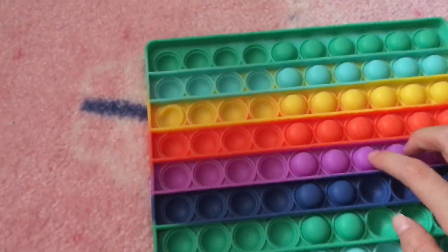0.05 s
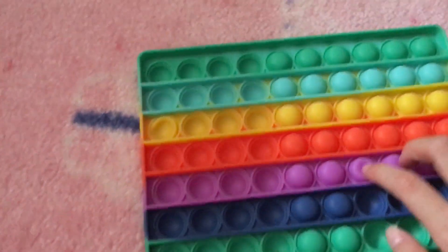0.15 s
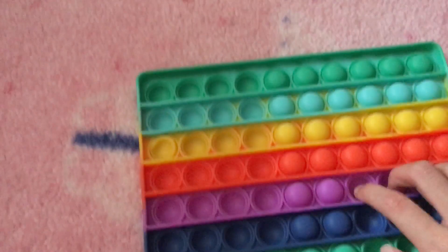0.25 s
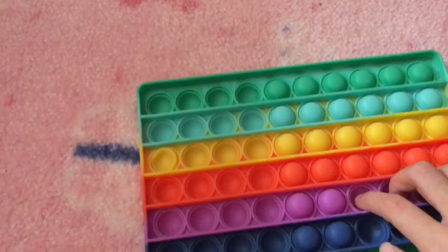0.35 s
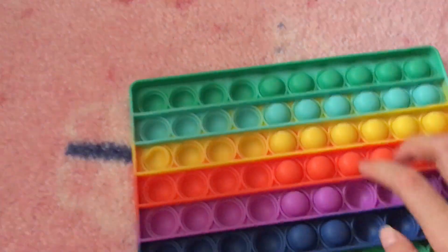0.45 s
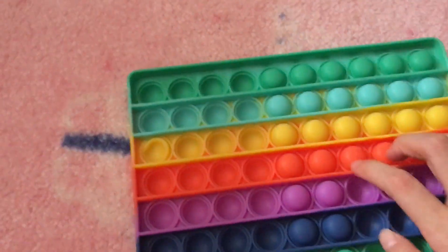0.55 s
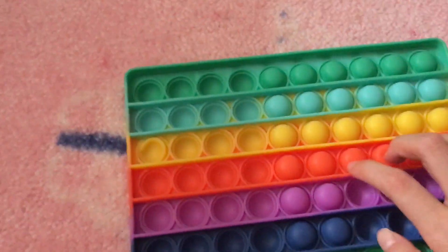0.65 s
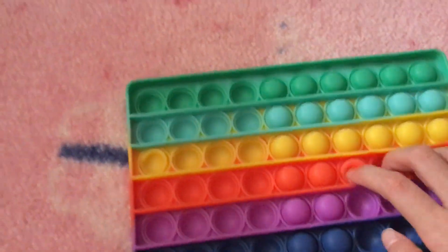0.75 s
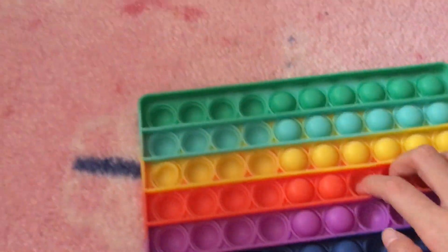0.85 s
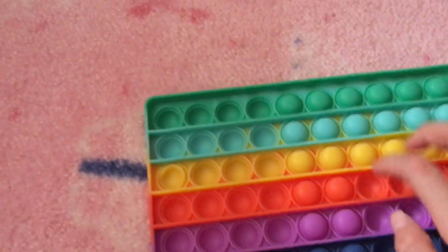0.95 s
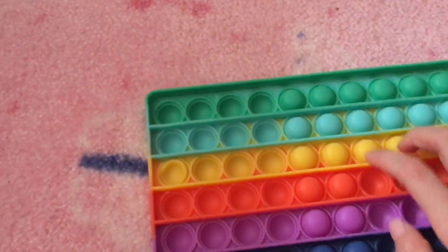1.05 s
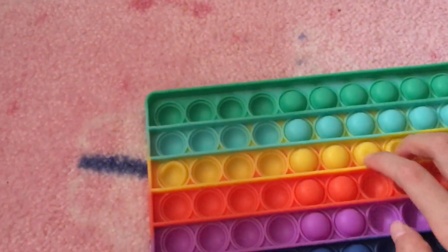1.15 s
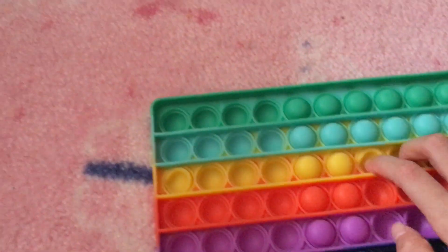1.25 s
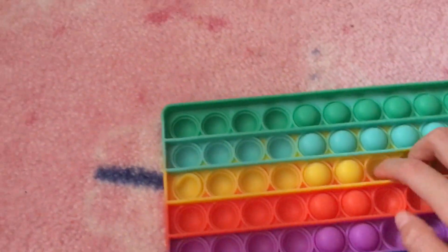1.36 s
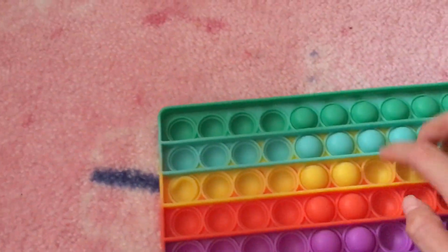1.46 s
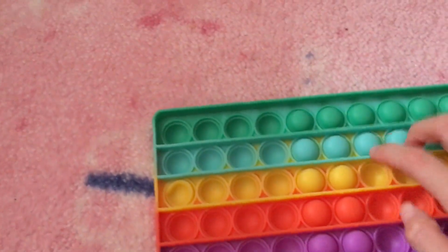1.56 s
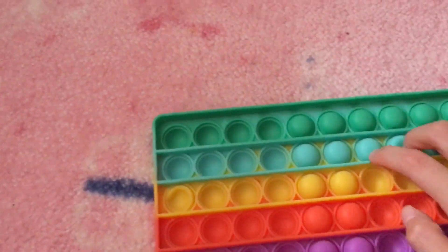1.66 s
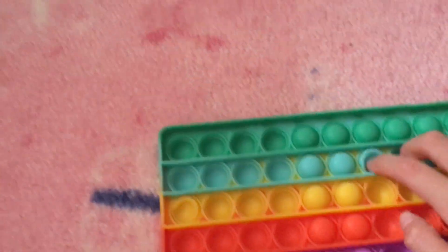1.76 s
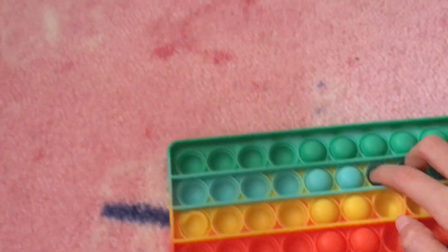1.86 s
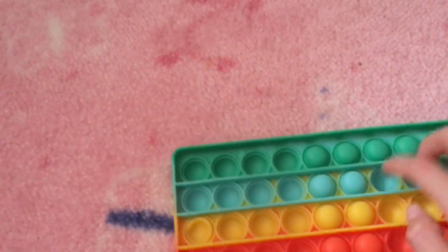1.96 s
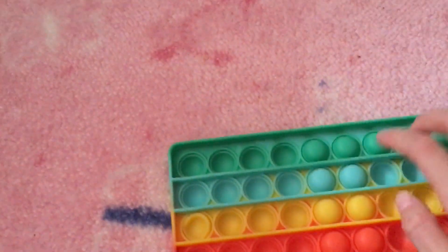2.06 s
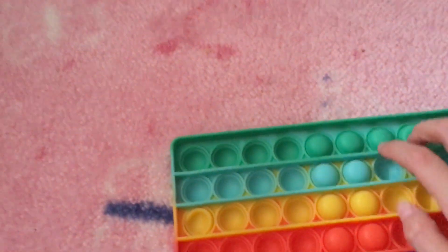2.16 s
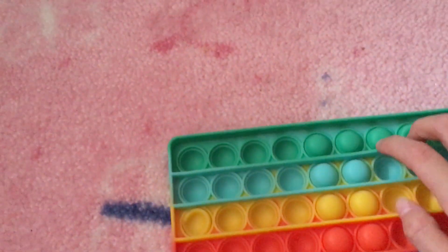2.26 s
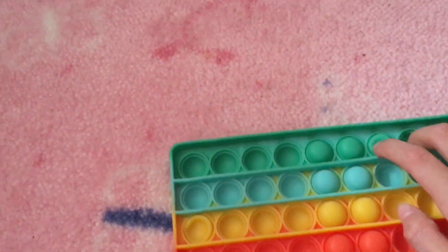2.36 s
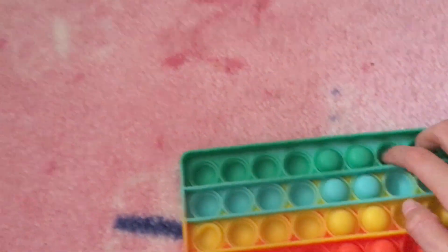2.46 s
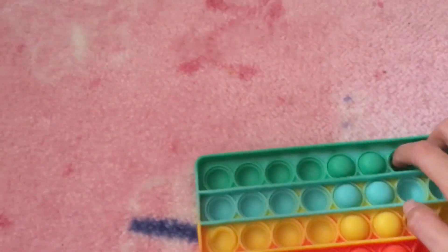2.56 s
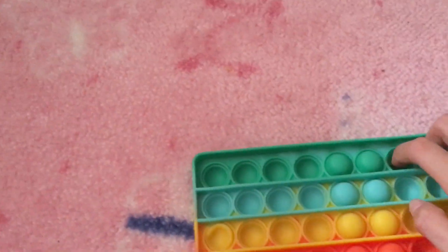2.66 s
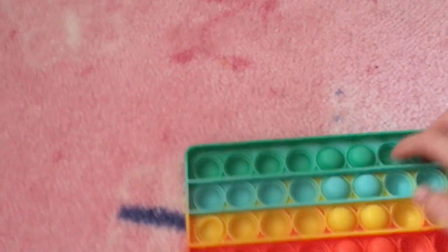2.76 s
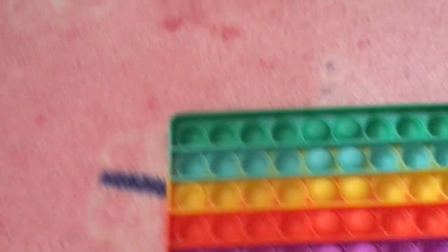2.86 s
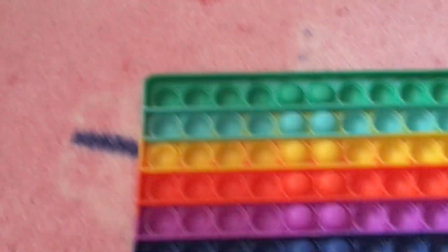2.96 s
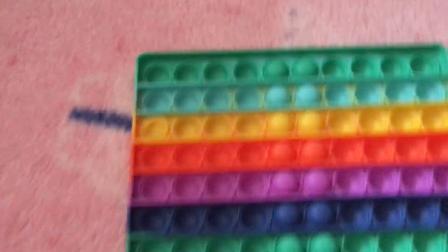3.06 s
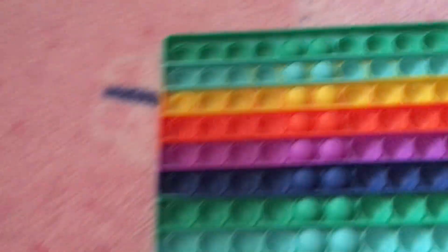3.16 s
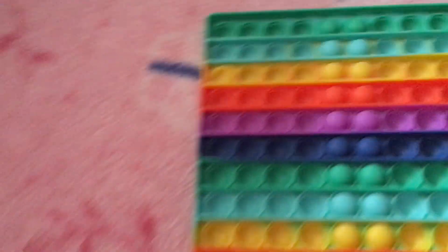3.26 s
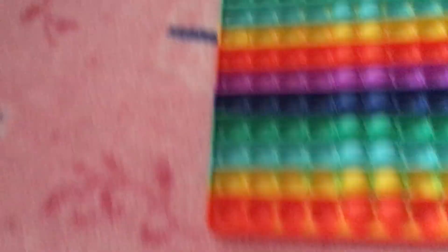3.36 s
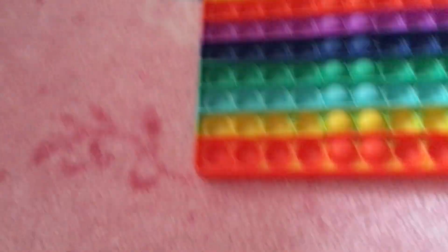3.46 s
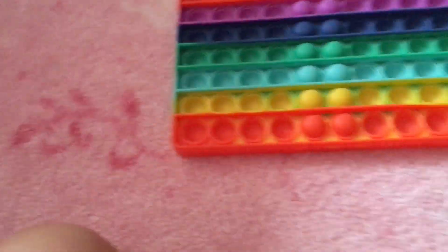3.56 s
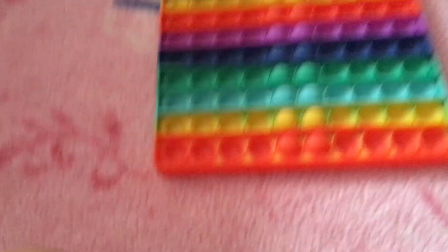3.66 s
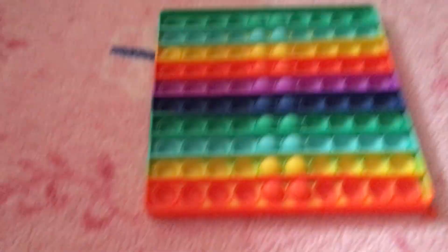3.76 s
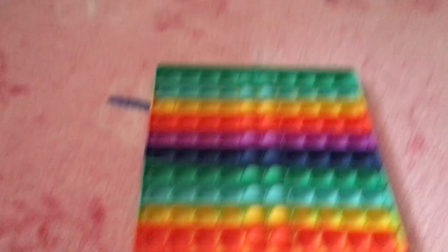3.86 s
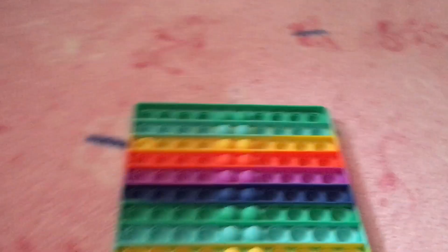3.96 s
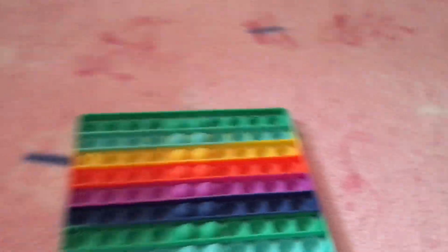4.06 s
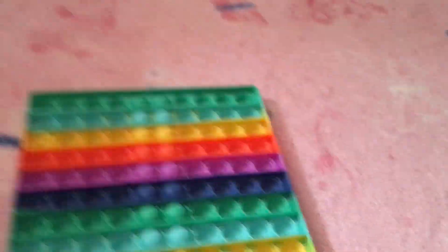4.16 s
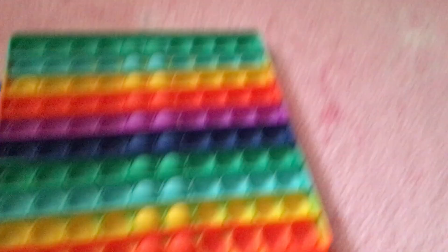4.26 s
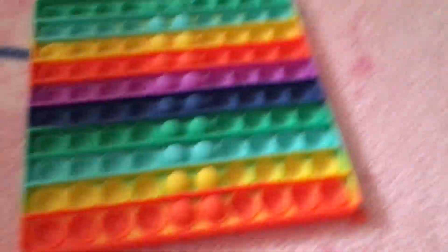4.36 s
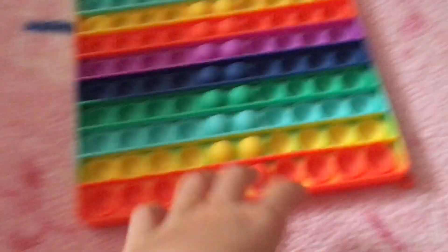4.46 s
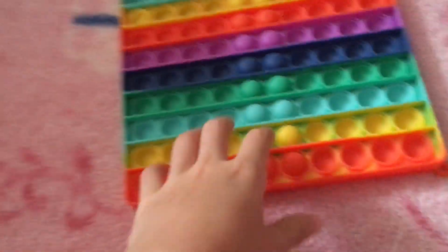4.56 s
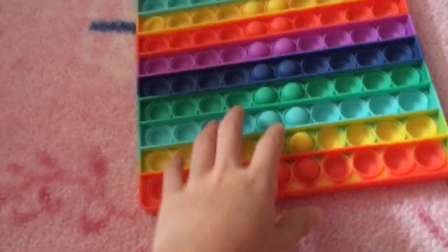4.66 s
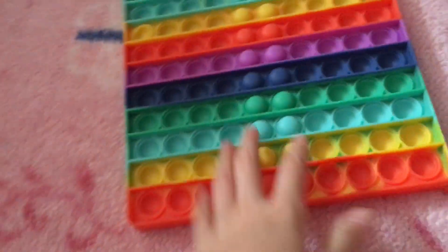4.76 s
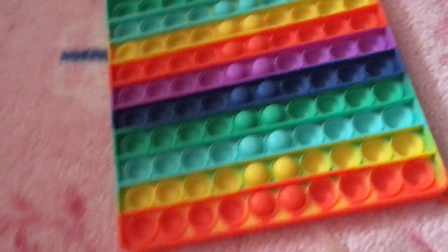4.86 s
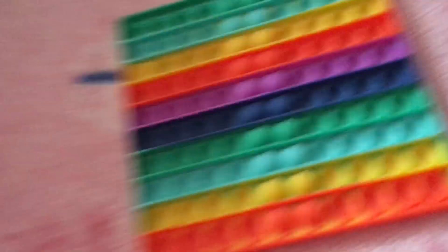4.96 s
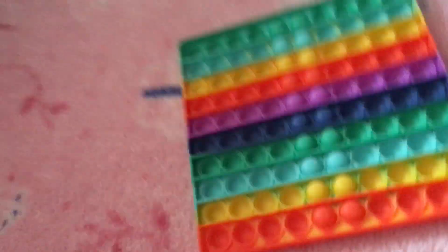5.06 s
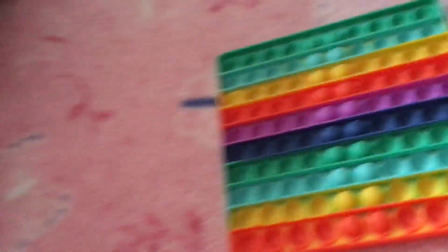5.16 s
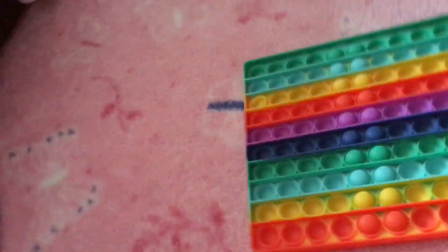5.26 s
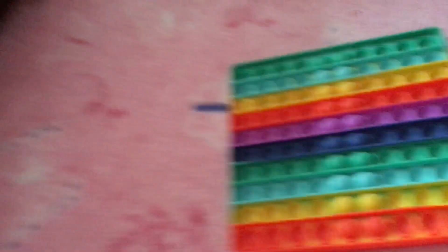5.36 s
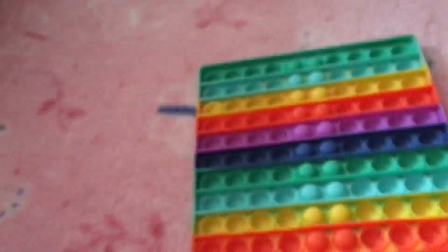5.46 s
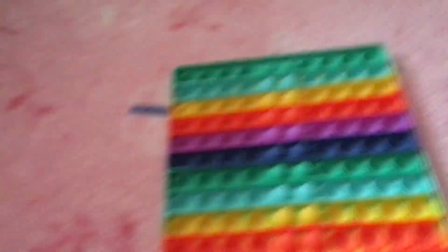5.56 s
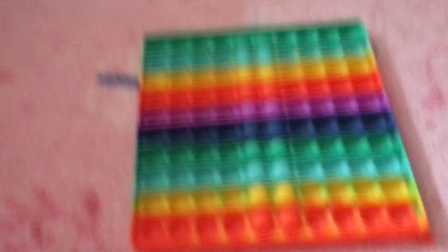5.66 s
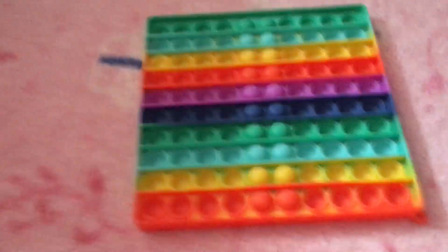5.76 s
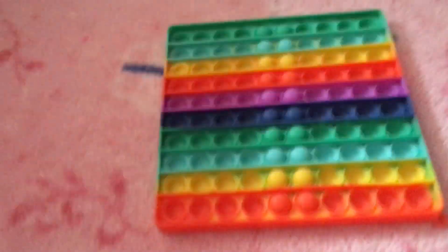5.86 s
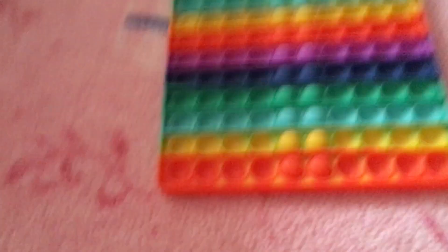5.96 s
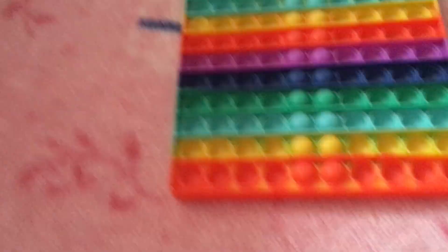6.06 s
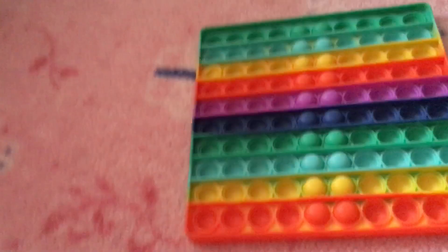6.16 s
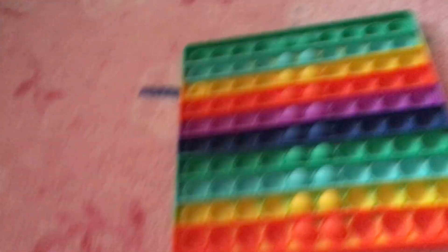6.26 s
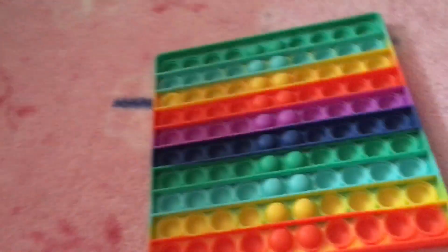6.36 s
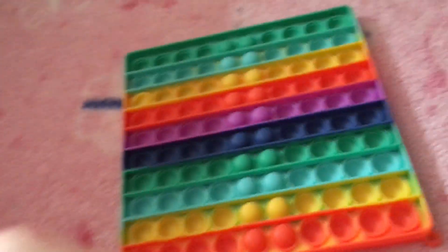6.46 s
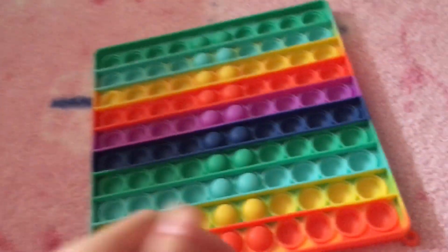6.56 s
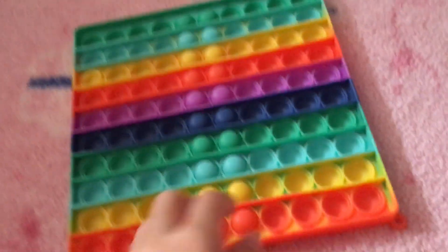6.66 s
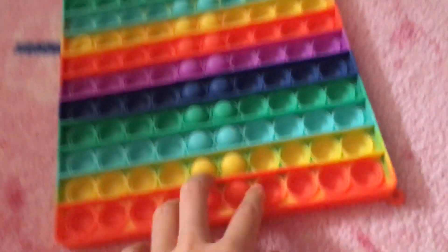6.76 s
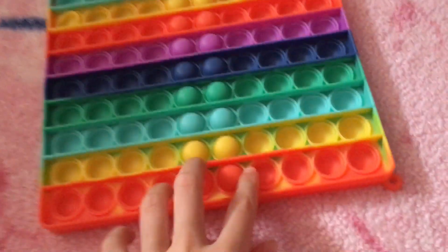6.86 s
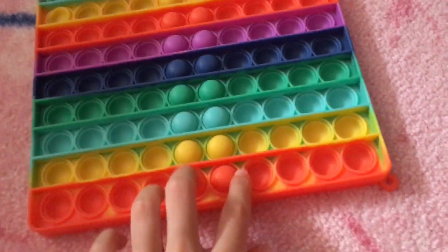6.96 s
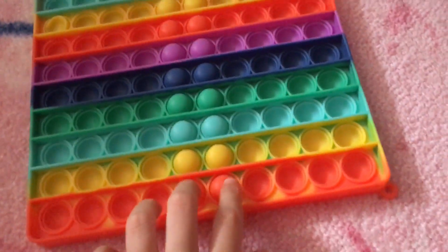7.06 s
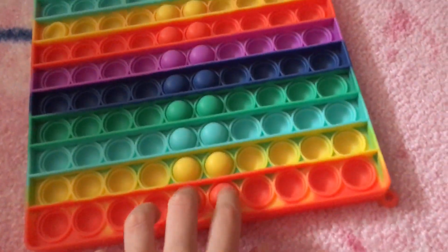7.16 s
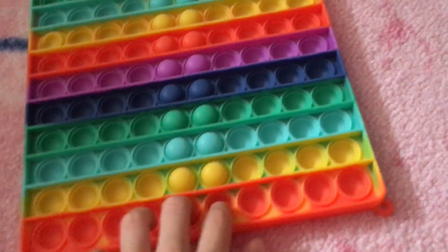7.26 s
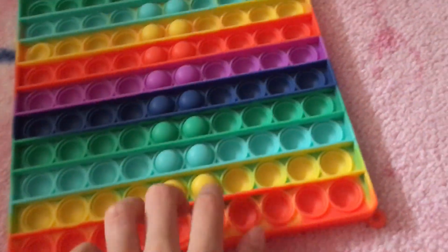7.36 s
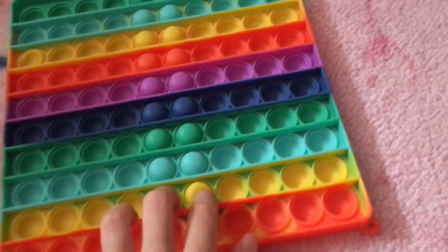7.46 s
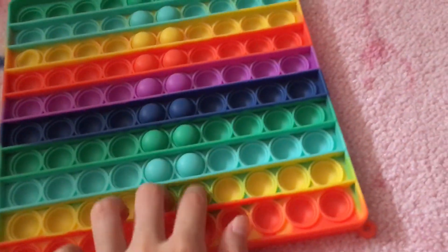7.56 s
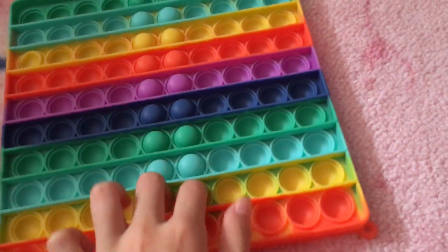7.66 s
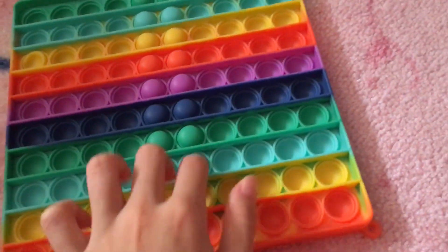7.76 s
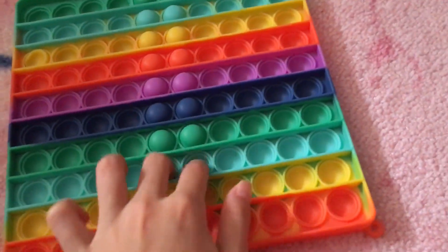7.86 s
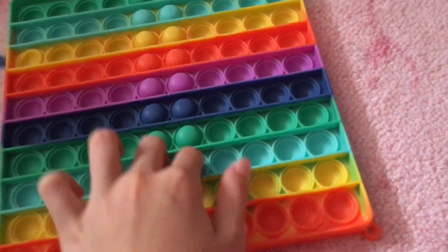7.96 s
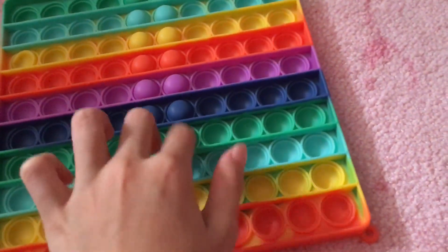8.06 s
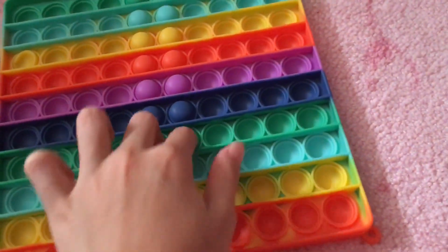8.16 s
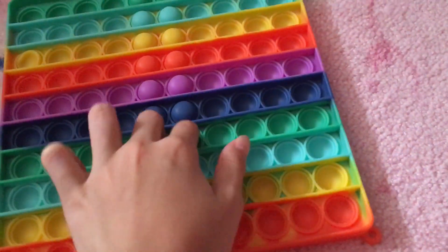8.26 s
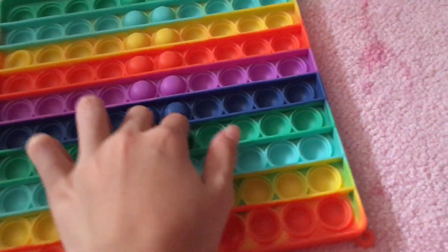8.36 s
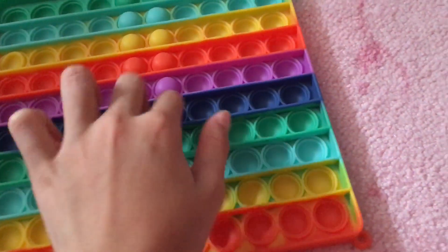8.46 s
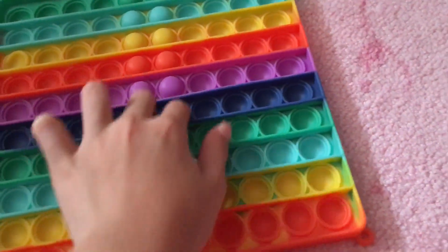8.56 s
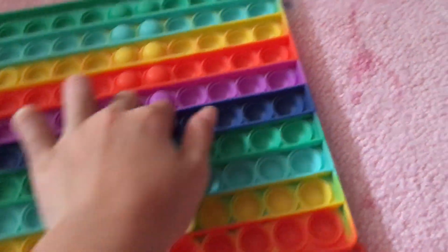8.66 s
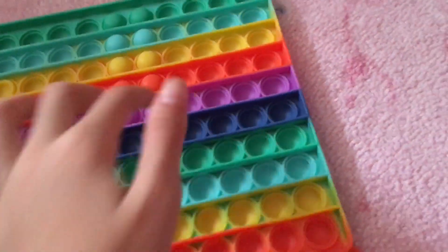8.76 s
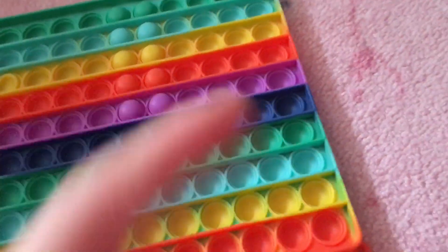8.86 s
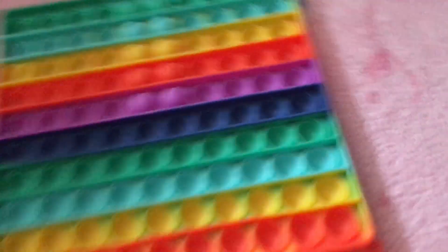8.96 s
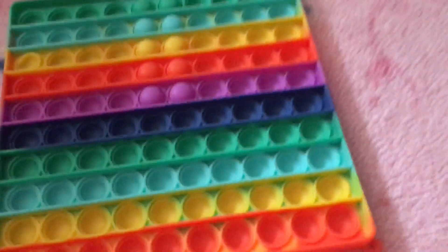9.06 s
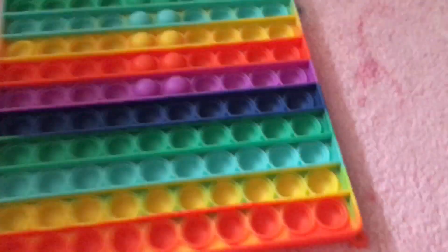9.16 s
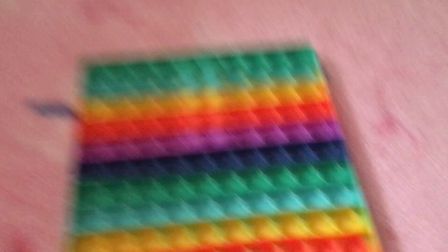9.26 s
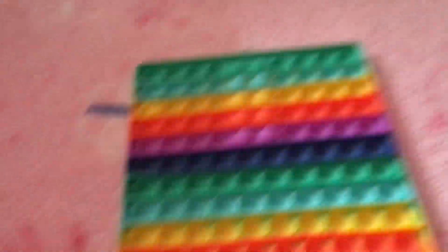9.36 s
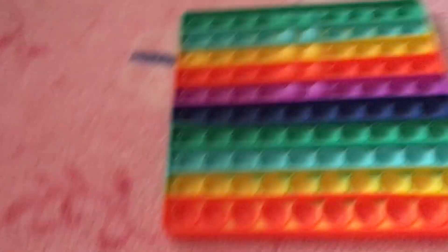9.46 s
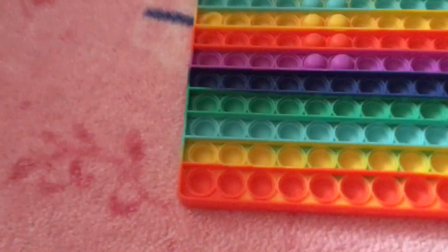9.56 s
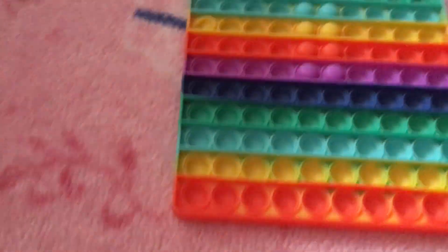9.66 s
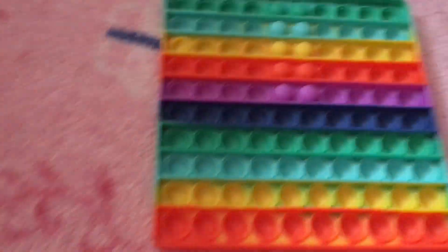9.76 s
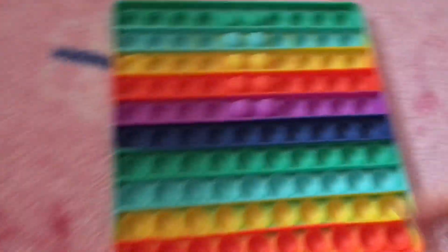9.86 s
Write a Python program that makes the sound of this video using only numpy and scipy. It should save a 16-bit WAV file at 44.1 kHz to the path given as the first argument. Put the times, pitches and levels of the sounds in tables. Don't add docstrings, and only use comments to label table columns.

```python
import sys
import numpy as np
from scipy import signal
from scipy.fft import rfft, irfft, next_fast_len
from scipy.io import wavfile

SR = 44100
rng = np.random.default_rng(int(sys.argv[2]) if len(sys.argv) > 2 else 0)


def makeup_ratio(level_db):
    decades = np.asarray(level_db, float) / 20
    return 10 ** decades


def master(y):
    cut = np.clip(np.atleast_2d(y).T, -1, 1)
    pcm = np.round(cut * 32767)
    wavfile.write(sys.argv[1], SR, pcm.astype(np.int16))


N = 437913


def rms_one(x):
    return x / np.sqrt(np.mean(x ** 2) + 1e-20)


def band(x, low_hz, high_hz, order=2):
    sos = signal.butter(order, [low_hz, min(high_hz, .45 * SR)], "band", fs=SR, output="sos")
    return signal.sosfilt(sos, x)


def coloured(spectrum):
    size = next_fast_len(N)
    hz, level_db = np.transpose(spectrum)
    grid_hz = np.maximum(np.fft.rfftfreq(size, 1 / SR), 1)
    gain = makeup_ratio(np.interp(np.log(grid_hz), np.log(hz), level_db))
    return rms_one(irfft(rfft(rng.standard_normal(size)) * gain)[:N])


def drift(rate):
    knots = rng.standard_normal(4000)
    return rms_one(np.interp(np.arange(N) / SR * rate, np.arange(4000), knots))


def in_time(rows):
    return makeup_ratio(np.interp(np.arange(N) / SR, *np.transpose(rows)))


def swell(t, rise_s):
    u = np.maximum(t, 0) / rise_s
    return (u * np.exp(1 - u)) ** 2


def add(out, s, sound, lead_s=0):
    at = round((s - lead_s) * SR)
    sound = sound[max(-at, 0):N - at]
    out[max(at, 0):max(at, 0) + len(sound)] += sound


def strokes(rows):
    ms = np.arange(N // 20 + 1) * 20000 / SR
    power = np.zeros(len(ms))
    for s, db, rise_ms, fall_ms in rows:
        late_ms = ms - 1000 * s
        power += makeup_ratio(2 * db - 20 * (late_ms / np.where(late_ms < 0, rise_ms, fall_ms)) ** 2)
    return np.interp(np.arange(N) / 20, np.arange(len(power)), np.sqrt(power))


def flicked(rows):
    return [(s, db, 5, 16) for s, db in rows]


def grains(per_s, spread_db):
    sizes = makeup_ratio(spread_db * np.minimum(rng.exponential(1, N), 4)) * rng.choice([-1, 1], N)
    return sizes * (rng.random(N) < per_s / SR)


def snap_of_rim(t, hz, noise):
    turn = 2 * np.pi * hz * t
    snap = 0.73 * np.exp(-(t / 0.00032) ** 2) * np.cos(2 * np.pi * hz * (t - 90 * t ** 2))
    snap += 0.25 * swell(t + 0.001, 0.001) * np.cos(0.94 * turn)
    snap += 0.009 * swell(t, 0.005) * np.sin(1.4 * turn)
    snap += np.exp(-(t / 0.00081) ** 2) * (0.03 * np.sin(1.97 * turn) + 0.0056 * np.sin(3.8 * turn))
    snap += 0.15 * np.exp(np.minimum(t, 0) / 0.0035) * (t < 0) * band(noise, 2100, 2800)
    return band(snap, 430, 12000)


def ring_of_wall(t, noise):
    wall_hz = 2123
    struck_hz = wall_hz * makeup_ratio(0.51 * rng.standard_normal())
    ring = swell(t + .0004, 0.0016) * np.cos(2 * np.pi * struck_hz * t)
    hum = rms_one(band(noise, .9 * wall_hz, 1.1 * wall_hz))
    return ring + 0.12 * np.exp(-np.abs(t) / 0.006) * hum


def crack_of_skin(t, crack_db):
    top_hz = 7500 * makeup_ratio(.15 * max(crack_db + 20, 0))
    patch_hz = 4700 * makeup_ratio(2.0 * rng.standard_normal())
    crack = np.exp(-(t / 0.001) ** 2) * band(rng.standard_normal(len(t)), 1600, top_hz)
    patch = band(rng.standard_normal(len(t)), 0.8 * patch_hz, 1.25 * patch_hz)
    return crack + 0.9 * np.exp(-(t / 0.0022) ** 2) * patch


# time in seconds, dome level in dB, dome pitch in Hz,
# snap level and skin crack level in dB against the dome.
FIRST_POPS = [(0.205, -11.5, 677, -1.5, -30), (0.216, -23.5, 606, -1.5, -32.5),
              (0.2216, -12, 700, 1.5, -39.5), (0.2356, -10.5, 660, -17.5, -34.5),
              (0.2513, -18, 680, 3.5, -26), (0.7218, -23.5, 654, -6.5, -30.5),
              (0.725, -17, 695, -10.5, -20.5), (0.7289, -34.5, 690, -21.5, -1.5),
              (0.734, -11, 655, -1, -14), (0.7608, -33, 540, -13.5, -14.5), (0.7959, -18.5, 680, 2, -21),
              (0.818, -14, 644, -9.5, -20), (1.1986, -22.5, 680, -18, -22.5), (1.2077, -13.5, 648, -8, -33),
              (1.2147, -16.5, 746, -12, -12.5), (1.3041, -13.5, 640, 0.5, -23),
              (1.3203, -18.5, 630, 3.5, -21.5), (1.7229, -32.5, 472, 0, -11),
              (1.7398, -21.5, 770, -10.5, -37), (1.7554, -18, 643, -0.5, -20), (1.8026, -21, 700, 0.5, -18),
              (1.828, -17.5, 625, -0.5, -24)]
LAST_POPS = [(7.2218, -26.5, 641, -6, -22), (7.2308, -25, 497, -3, -10.5), (7.2478, -25.5, 480, -10, -8.5),
             (7.5706, -15.5, 657, 6.5, -17.5), (7.5838, -14.5, 668, 5.5, -8.5),
             (7.8548, -25, 680, -27, -26), (7.8613, -30, 740, -2, -36), (7.8674, -15, 628, 1.5, -31),
             (7.8806, -14.5, 630, -3, -46), (8.2556, -12.5, 654, -0.5, -25), (8.284, -11, 717, 0, -17),
             (8.5563, -28.5, 632, -15.5, -20), (8.5686, -18, 590, -9, -12), (8.5728, -12, 680, -18, -32)]
# time in seconds, dome level in dB, dome pitch in Hz, skin crack level in dB against the dome.
TOUCHES = [(0.004, -40, 1050, -10.5), (0.5179, -37.5, 1140, -22), (0.526, -35.5, 1050, -13),
           (0.93, -50, 720, -4), (1.0545, -40.5, 1120, -12), (1.064, -35, 1090, -17),
           (1.0897, -45, 1070, -37), (1.277, -46, 780, -7), (1.478, -45.5, 605, -6),
           (1.5818, -36, 1050, -13), (1.6, -53, 1166, -17), (2.1086, -42, 1070, -5.5),
           (2.123, -48, 497, -10), (2.3392, -41, 483, -27), (2.3515, -31.5, 456, -8),
           (2.3606, -32, 790, -5.5), (2.4699, -29.5, 473, -11), (2.587, -29, 450, -7.5),
           (2.785, -56, 1115, 6), (3.7868, -28, 1480, -39), (5.793, -27, 790, -46),
           (7.4416, -45, 1047, -15), (7.5517, -38.5, 830, -14.5), (7.8235, -39.5, 1050, -24),
           (8.103, -44.5, 977, -21), (8.2006, -40.5, 510, -35.5), (8.5246, -42, 1050, -30),
           (8.5339, -37.5, 1010, -20)]
# time in seconds, level in dB against the dome.
WALL_LEVEL = [(0.21, -14), (0.25, -12), (0.73, -19.5), (0.81, -20), (1.21, -23), (1.31, -13), (1.74, -21),
              (1.82, -22.5), (2.5, -30), (7.23, -22), (7.57, -12), (7.87, -24), (8.27, -27), (8.57, -29)]


def pops():
    lead_s = .012
    out, t = np.zeros(N), np.arange(1300) / SR - lead_s
    touches = [(s, db, hz, 1.5 + 0.41 * crack_db, crack_db) for s, db, hz, crack_db in TOUCHES]
    for s, dome_db, dome_hz, snap_db, crack_db in sorted(FIRST_POPS + LAST_POPS + touches):
        rim_noise, air_noise = rng.standard_normal((2, len(t)))
        pop = swell(t + .0006, 0.0012) * np.cos(2 * np.pi * dome_hz * (t - .0014))
        pop += 0.073 * swell(t, 0.0038) * rms_one(band(air_noise, 0.8 * dome_hz, 1.3 * dome_hz))
        pop += makeup_ratio(np.interp(s, *np.transpose(WALL_LEVEL))) * ring_of_wall(t, rim_noise)
        snap_hz = 1600 * makeup_ratio(.5 * rng.standard_normal())
        pop += makeup_ratio(snap_db + 2.0) * snap_of_rim(t, snap_hz, rim_noise)
        thud_db = -18 - 0.38 * dome_db
        thud = swell(t + 0.00037, 0.002) * np.cos(2 * np.pi * 300 * (t - .0022))
        pop += makeup_ratio(thud_db - 5.5) * thud
        pop += makeup_ratio(crack_db - 9.5) * crack_of_skin(t, crack_db)
        add(out, s, makeup_ratio(dome_db) * pop, lead_s)
    dipped = signal.lfilter(*signal.iirnotch(2564, 6.5, SR), out)
    return (out + 2 * dipped) / 3


# pitch in Hz, width in Hz, level in dB,
# time to fall by 60 dB in seconds.
MAT_RING = [(620, 590, -4.5, 0.14), (1050, 440, 1.5, 0.12), (1500, 560, -1.5, .18), (2000, 500, -3.5, 0.16),
            (2900, 1300, -2.5, .13)]


def ringing(x):
    t = np.arange(SR // 4) / SR
    noise = rng.standard_normal(len(t))
    modes = 0
    for hz, width, db, t60 in MAT_RING:
        modes = modes + makeup_ratio(db - 60 * t / t60) * rms_one(band(noise, hz - width / 2, hz + width / 2))
    return makeup_ratio(-55.5) * signal.fftconvolve(x, (1 - np.exp(-t / 0.0022)) * modes)[:N]


# time of the top in seconds, level in dB,
# rise in ms, fall in ms.
DRAGS = [(1.465, -65, 63, 35), (2.815, -67, 7.9, 27), (2.975, -68.5, 15, 150), (3.291, -59, 37, 100),
         (3.58, -57.5, 36, 74), (3.82, -54.5, 130, 100), (3.919, -51, 15, 92), (4.105, -48, 82, 51),
         (4.22, -58, 21, 75), (4.322, -52, 92, 41), (4.811, -68.5, 47, 65), (5.051, -57, 110, 54),
         (5.375, -50, 34, 76), (5.591, -55.5, 68, 14), (5.775, -62, 200, 63), (5.982, -48.5, 65, 30),
         (6.372, -54, 12.5, 40), (9.097, -57.5, 100, 114), (9.14, -59, 42, 30), (9.185, -60, 12, 9.6),
         (9.303, -39, 35, 54), (9.7, -69.5, 760, 130)]
# time of the top in seconds, level in dB,
# half length in ms.
JERKS = [(3.119, -59, 9.2), (3.464, -59.5, 51), (3.611, -55, 19), (3.995, -31.5, 18.6), (4.302, -39, 5.2),
         (4.376, -54, 17), (5.145, -57.5, 40), (5.289, -47.5, 42), (5.424, -35, 7.8), (5.531, -46, 26),
         (5.844, -59.5, 16), (5.952, -47, 18), (5.972, -57, 11), (5.997, -48, 12), (6.073, -50, 12.7),
         (6.11, -64.5, 13), (6.34, -55, 4.4), (6.44, -59, 11.3), (8.956, -42, 5.3), (9.129, -43.5, 14.5),
         (9.34, -31, 11), (9.361, -29, 18), (9.408, -39.5, 42), (9.613, -52, 9.3)]


def pull():
    long = strokes(DRAGS) * makeup_ratio(3 * drift(100))
    jerks = strokes([(s, db, ms, ms) for s, db, ms in JERKS])
    return np.hypot(long, jerks)


# pitch in Hz, width in Hz, level in dB.
MAT = [(327, 640, -3), (680, 465, 26), (1050, 210, 13.5), (1660, 130, 15.5), (2200, 670, 8.5)]


def mat_body(slips, pitch, dull_db):
    body = 0
    for hz, width, db in MAT:
        octaves_up = max(np.log2(hz / MAT[1][0]), 0)
        ring = rms_one(band(slips, pitch * hz - width / 2, pitch * hz + width / 2))
        body = body + makeup_ratio(db + 3.5 * drift(25) + dull_db * octaves_up) * ring
    return body


def drag(force):
    slips = grains(per_s=4000, spread_db=3)
    slack = mat_body(slips, 1, 0)
    taut = mat_body(slips, 1.21, -14)
    body = np.where(np.arange(N) < 8 * SR, slack, taut)
    rasp = grains(per_s=2000, spread_db=4)
    snags = band(grains(per_s=250, spread_db=3), 500, 3500, order=3)
    edges_hz = np.geomspace(400, 4400, 9)
    scratch = 0
    for low, high in zip(edges_hz, edges_hz[1:]):
        level_db = 2.5 * drift(45) - 14 * max(np.log2(high / 2400), 0)
        scratch = scratch + makeup_ratio(level_db) * band(rasp, low, high, order=3)
    scratch = rms_one(scratch) + rms_one(snags) / 2
    return force * rms_one(body) + makeup_ratio(-57.0) * np.tanh(force / makeup_ratio(-49.5)) * scratch


# time in seconds, peak level in dB, pitch in Hz.
CATCHES = [(3.118, -25, 483), (3.269, -47, 546), (3.337, -39, 783), (3.376, -43, 1090), (3.452, -37, 785),
           (3.572, -43.5, 797), (3.612, -46, 563), (3.655, -44, 600), (3.721, -51, 720), (3.983, -20, 730),
           (4.073, -33, 850), (4.122, -32, 593), (4.217, -37, 1500), (4.244, -38, 770), (4.261, -32, 1380),
           (4.283, -35, 1370), (4.364, -32, 1500), (4.906, -52, 1200), (4.932, -48, 500),
           (4.967, -39, 1630), (5.256, -41, 504), (5.279, -46, 490), (5.306, -33, 560), (5.361, -32, 596),
           (5.515, -43, 695), (5.542, -35, 714), (5.658, -44, 507), (5.672, -34.5, 770), (5.848, -40, 670),
           (5.888, -33.5, 720), (5.903, -26, 830), (5.917, -30, 870), (5.944, -25.5, 974),
           (5.953, -25, 716), (5.984, -31, 730), (6.067, -48, 633), (6.285, -40.5, 625), (6.363, -34, 540),
           (6.764, -48.5, 894), (8.414, -45.5, 980), (9.014, -31, 560), (9.038, -35, 560),
           (9.087, -36, 676), (9.267, -43, 520), (9.291, -27, 784), (9.31, -23.5, 880), (9.331, -30, 726),
           (9.355, -29, 1040), (9.367, -22, 840), (9.433, -32, 1020), (9.441, -30, 1030), (9.61, -39, 950),
           (9.693, -44, 756)]


def catches():
    out, t = np.zeros(N), np.arange(700) / SR
    for s, peak_db, hz in CATCHES:
        grit = rms_one(band(rng.standard_normal(len(t)), 0.67 * hz, 1.68 * hz))
        ring = np.sin(2 * np.pi * hz * t) + 0.53 * grit
        add(out, s, makeup_ratio(peak_db - 9) * swell(t, 1.37 / hz) * ring)
    return out


# time in seconds, peak level in dB, final pitch in Hz,
# swing time in ms, tap level in dB against the peak.
KNOCKS = [(2.971, -28.5, 184, 1.18, -14.5), (3.1155, -40, 162, 16, -9), (3.285, -37.5, 153, 18, -0.5),
          (3.785, -34, 163, 6.7, 1.5), (3.832, -29.5, 283, 2.6, -10), (3.918, -27, 106, 10.7, -38),
          (4.098, -34, 124, 12.4, -32), (4.294, -33, 160, 8.2, 6.5), (4.328, -36, 113, 14, 0.5),
          (5.013, -29, 114, 13, -6), (5.421, -5, 165, 12.1, -52), (5.495, -24.5, 189, 2.4, -21),
          (5.592, -33.5, 163, 11.3, -5.5), (5.789, -37, 204, 16, -15), (6.162, -40, 188, 11.3, -13),
          (6.37, -36.5, 140, 12, -21), (8.953, -13.5, 136, 10.3, -19.5), (9.02, -29.5, 143, 2.8, -6.5),
          (9.05, -38, 99.6, 10, -7), (9.12, -22.5, 160, 2.2, -13.5)]
# time in seconds, peak level in dB, final pitch in Hz.
NUDGES = [(3.45, -46, 145), (3.535, -36.5, 156), (3.598, -41, 244), (4.903, -50, 141), (4.936, -45, 126),
          (5.203, -48.5, 152), (5.886, -44, 302), (5.901, -54, 302), (5.979, -38, 218), (6.057, -53, 188),
          (6.283, -47, 263), (6.335, -44.5, 197), (9.035, -38, 148), (9.1, -39.5, 247), (9.134, -43, 135),
          (9.434, -43, 105), (9.69, -54, 258)]


def bumps():
    out, t = np.zeros(N), np.arange(2000) / SR
    nudges = [(s, db, hz, 1000 * 2.5 / hz, 1.5) for s, db, hz in NUDGES]
    for s, peak_db, end_hz, swing_ms, tap_db in KNOCKS + nudges:
        turns = end_hz * t + 0.44 * (1 - np.exp(-t / 0.001))
        push = (1 - np.exp(-t / .0007)) * np.exp(-(1000 * t / swing_ms) ** 2)
        swing = -push * np.sin(2 * np.pi * turns)
        swing -= 0.13 * swell(t, 0.00064 * swing_ms) * np.cos(2 * 2 * np.pi * turns)
        tap_turns = 800 * t + 1.21 * (1 - np.exp(-t / 0.0015))
        tap = .6 * swell(t, 0.00081) * np.sin(2 * np.pi * tap_turns)
        rough = band(rng.standard_normal(len(t)), 500, 2500, order=4)
        tap += 1.5 * swell(t, .0025) * rough
        add(out, s + 0.00334, makeup_ratio(peak_db) * swing)
        add(out, s + 0.000834, makeup_ratio(peak_db + tap_db - 3.5) * tap)
    return out


# time in seconds, peak level
# in dB, lowest Hz, highest Hz.
TICKS = [(0.221, -35.5, 3400, 3960), (7.8187, -58, 700, 3500), (0.931, -54, 2500, 6100),
         (2.788, -69, 4200, 6400), (2.832, -50.5, 4300, 5900), (3.1175, -43, 4240, 8400),
         (3.5361, -34.5, 2200, 3600), (3.5968, -44, 4100, 6900), (3.9504, -42.5, 3800, 11000),
         (4.099, -38.5, 4000, 9200), (4.136, -50, 2970, 7000), (4.264, -39, 2600, 6900),
         (4.283, -47, 2000, 8000), (3.131, -58, 5060, 11000), (3.288, -46, 1500, 9000),
         (3.403, -58, 6500, 10500), (3.661, -57, 2000, 6000), (4.9325, -48, 1500, 15030),
         (4.968, -62, 6000, 14000), (5.012, -47, 1000, 8000), (5.4213, -35, 3990, 15000),
         (5.4254, -27, 5470, 15000), (5.441, -31, 4500, 14000), (5.451, -42.5, 4500, 14000),
         (5.538, -42, 3000, 11900), (5.641, -60, 2600, 6000), (6.163, -65, 2000, 8900),
         (6.189, -63, 1000, 8000), (6.21, -55, 1000, 9000), (6.287, -55, 1000, 2980),
         (6.339, -49, 1500, 6000), (6.374, -45.5, 2600, 11000), (7.029, -48.5, 2300, 4600),
         (7.23, -40.5, 5060, 15400), (7.246, -45, 4040, 15500), (8.955, -38, 2600, 15600),
         (8.998, -53, 2000, 11000), (9.051, -55, 1000, 10000), (9.181, -58, 2000, 10000),
         (9.022, -54, 2600, 6000), (9.099, -43, 2800, 6400), (9.1227, -45, 2600, 11000),
         (9.266, -55, 2600, 7000), (9.434, -48, 3500, 9100), (9.694, -56, 2600, 6000)]


def ticks():
    out, t = np.zeros(N), np.arange(200) / SR
    for s, peak_db, low_hz, high_hz in TICKS:
        burst = rms_one(band(rng.standard_normal(len(t)), low_hz, high_hz))
        add(out, s, 0.42 * makeup_ratio(peak_db) * swell(t, 0.0011) * burst)
    return out


# frequency in Hz, level in dB per Hz.
CLOTH = [(880, 1), (1500, 8), (6120, -6), (8660, -6.5), (10200, -5.5), (15100, -6), (16000, -2)]
# time of the top in seconds,
# level in dB, rise in ms, fall in ms.
BRUSHES = [(3.081, -57.5, 91, 49), (3.283, -59.5, 116, 260), (3.592, -61, 190, 330),
           (3.787, -60.5, 25, 120), (3.993, -59, 82, 150), (4.099, -56.5, 66, 11), (4.37, -53.5, 150, 30),
           (4.837, -62, 63, 210), (5.045, -58, 30, 40), (5.102, -48, 120, 37), (5.268, -56.5, 72, 290),
           (5.531, -58, 28, 145), (5.787, -54, 42, 21), (5.952, -58.5, 81, 57), (6.068, -60, 26, 100),
           (6.368, -62.5, 53, 67), (9.025, -61.5, 33, 380), (9.429, -55.5, 290, 87), (9.58, -67, 83, 43),
           (9.8, -64.5, 100, 165), (4.97, -62, 88, 60), (4.22, -53.5, 24, 48)]
# time of the top in seconds, level in dB.
FLICKS = [(2.832, -60), (3.122, -54), (3.928, -56), (3.941, -55), (4.135, -53.5), (4.402, -50.5),
          (4.938, -56), (5.434, -61), (5.835, -63), (5.988, -48.5), (6.338, -56), (8.956, -53),
          (9.358, -46.5), (9.61, -64)]
# time of the top in seconds, level in dB.
SCUFFS = [(1.435, -69), (2.47, -69), (2.588, -67), (2.78, -68.5), (2.812, -72), (2.834, -68)]
# time of the top in seconds, level in dB, rise in ms,
# fall in ms, lowest Hz.
SWISHES = [(3.921, -49, 4.7, 27, 8000), (4.092, -54, 62, 12, 7000), (4.375, -62.5, 22, 27, 3950),
           (5.1, -51.5, 77, 52, 2720)]


def cloth():
    hiss = coloured(CLOTH)
    patchy = makeup_ratio(1.5 * drift(25)) * band(hiss, 11500, 24000)
    for low_hz in (900, 1440, 2300, 3700, 5900, 8200):
        patchy += makeup_ratio(1.3 * drift(40)) * band(hiss, low_hz, 1.6 * low_hz)
    crackle = rms_one(band(grains(per_s=400, spread_db=2.5), 3000, 15000, order=1))
    scuff = strokes(flicked(SCUFFS)) * rms_one(band(hiss, 4400, 6800))
    for s, db, rise_ms, fall_ms, low_hz in SWISHES:
        wipe = rms_one(band(hiss + .3 * crackle, low_hz, 3.3 * low_hz))
        scuff += strokes([(s, db, rise_ms, fall_ms)]) * wipe
    waver = makeup_ratio(1.2 * drift(140) + 1.5 * drift(35))
    return strokes(BRUSHES + flicked(FLICKS)) * waver * (patchy + 0.15 * crackle) + scuff


# time in seconds, level in dB.
SWAY = [(0.0, -64.5), (2.79, -65.5), (2.96, -62), (4.23, -65), (4.67, -77), (5.5, -51.5), (5.67, -60.5),
        (6.47, -69.5), (7.22, -70), (7.96, -58), (8.77, -65.5), (8.96, -50.5), (9.1, -62), (9.71, -76),
        (9.93, -63)]


def grip(force):
    lumps = rms_one(makeup_ratio(2.7 * drift(40)) * band(rng.standard_normal(N), 120, 420))
    sway = rms_one(makeup_ratio(2.4 * drift(10)) * band(rng.standard_normal(N), 46, 130))
    return makeup_ratio(-50.0) * np.tanh(force / makeup_ratio(-49.5)) * lumps + in_time(SWAY) * sway


# band in Hz, time to fall by 60 dB in seconds, level in dB.
ROOM = [(296, 0.18, -16), (700, 0.21, -21.5), (1270, 0.21, -20.5), (2533, 0.19, -15.5), (5040, 0.15, -11.5),
        (10030, .12, -32.5)]


def room(x):
    t = np.arange(SR // 2) / SR
    noise = rng.standard_normal(len(t))
    onset = 1 - np.exp(-t / 0.00076)
    tail = sum(makeup_ratio(db - 60 * t / t60) * band(noise, hz / 1.1, hz * 1.5) for hz, t60, db in ROOM)
    return signal.fftconvolve(x, onset * tail)[:N]


# frequency in Hz, level in dB per Hz.
FLOOR = [(53, -26.5), (90, -6), (201, -15.5), (249, -14), (323, -19.5), (753, -24.5), (896, -27.5),
         (1040, -27), (1240, -28.5), (16000, -48.5)]
# time of the middle in seconds, length in seconds,
# pitch in Hz, level in dB.
HUMS = [(.57, .07, 840, -73), (.6, .05, 1250, -75), (1.02, .04, 2050, -84), (1.98, .13, 750, -78),
        (6.97, .1, 750, -81), (6.9, .07, 1290, -80), (7.02, .05, 1330, -80), (7.13, .03, 1450, -77),
        (7.19, .025, 1450, -79), (7.35, .05, 1900, -85)]


def floor():
    t = np.arange(N) / SR
    out = makeup_ratio(-65.5 + 0.91 * drift(12)) * coloured(FLOOR)
    for s, length, hz, db in HUMS:
        gain = makeup_ratio(db + 5.5 + 2.5 * drift(40)) * np.exp(-((t - s) / length) ** 4)
        out += gain * np.sin(2 * np.pi * hz * t + 1.2 * drift(60))
    return out + makeup_ratio(-92) * rms_one(band(rng.standard_normal(N), 7900, 9500))


def scene():
    force, popped = pull(), pops()
    mat = popped + drag(force) + catches()
    heard = mat + ringing(popped) + makeup_ratio(-23.0) * room(mat)
    touching = bumps() + ticks() + cloth() + grip(force)
    return (heard + touching + floor())[None]


def low_pass(x):
    return signal.sosfilt(signal.butter(12, 16480, fs=SR, output="sos"), x)


def record(dry):
    low_cut = signal.butter(4, 36, "high", fs=SR, output="sos")
    high_cut = signal.cheby2(12, 50, 16400, fs=SR, output="sos")
    mix = signal.sosfilt(high_cut, signal.sosfilt(low_cut, dry))
    return low_pass(mix)


dry = scene()
out = record(dry)
master(out)
```